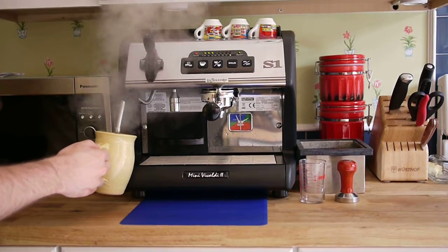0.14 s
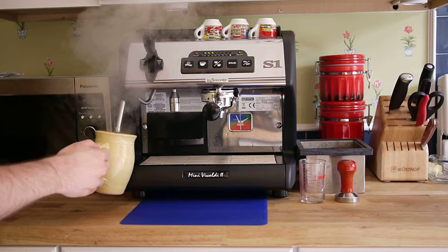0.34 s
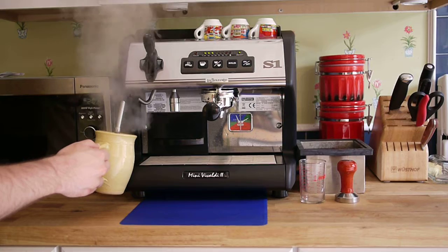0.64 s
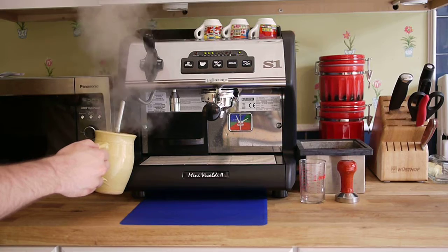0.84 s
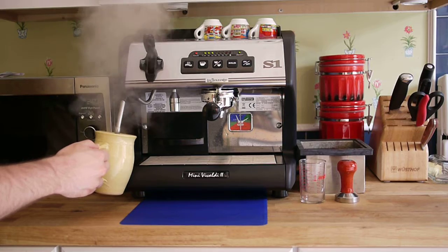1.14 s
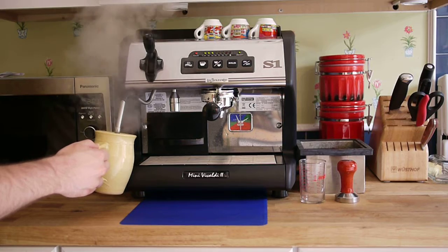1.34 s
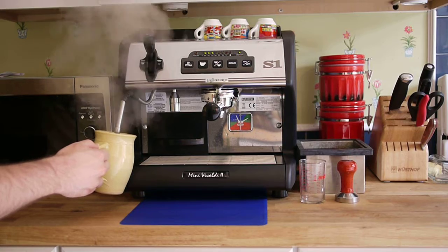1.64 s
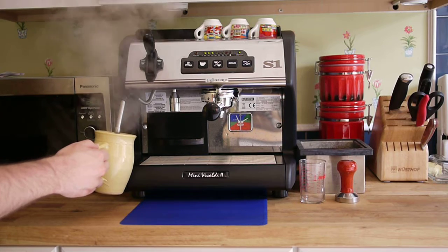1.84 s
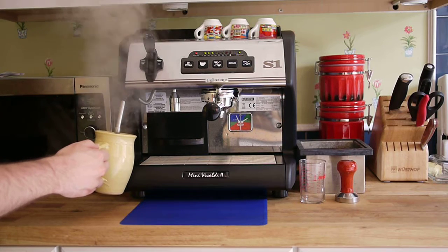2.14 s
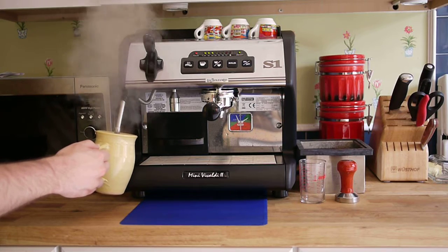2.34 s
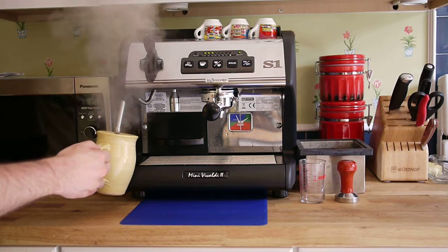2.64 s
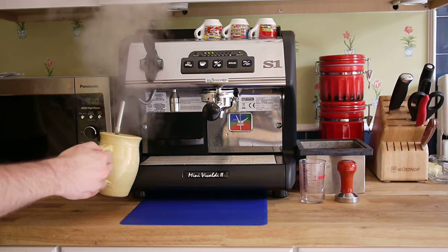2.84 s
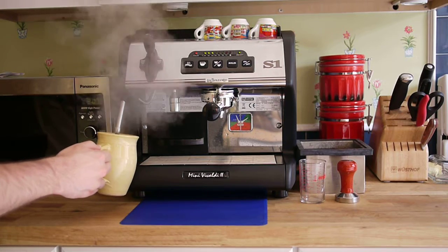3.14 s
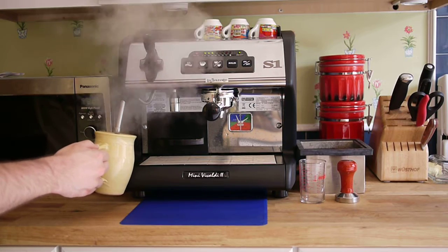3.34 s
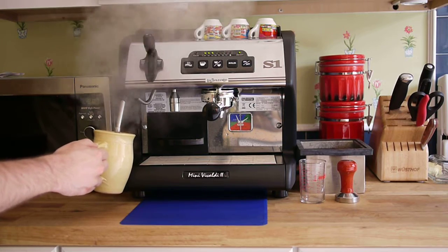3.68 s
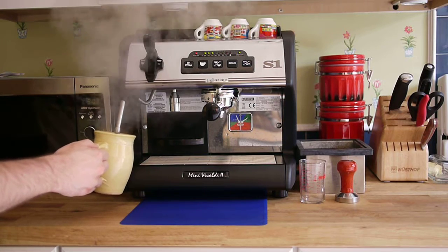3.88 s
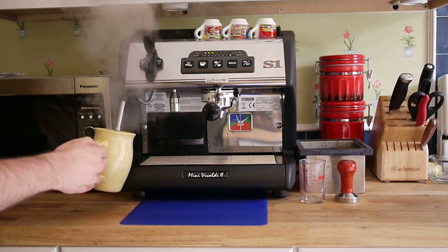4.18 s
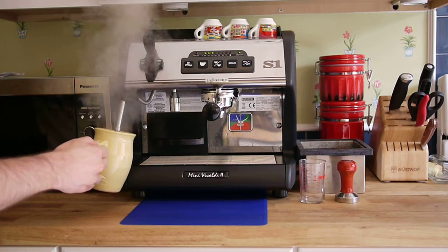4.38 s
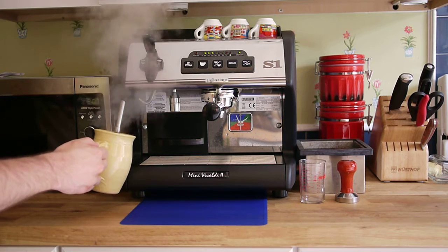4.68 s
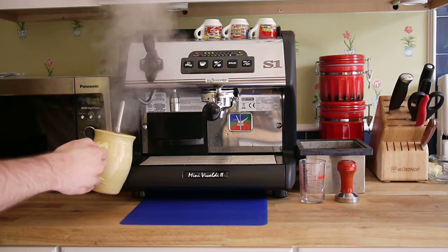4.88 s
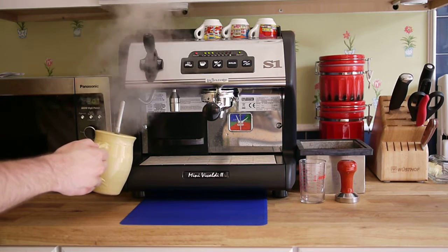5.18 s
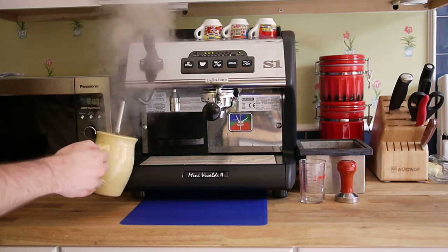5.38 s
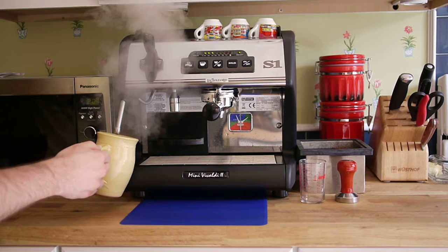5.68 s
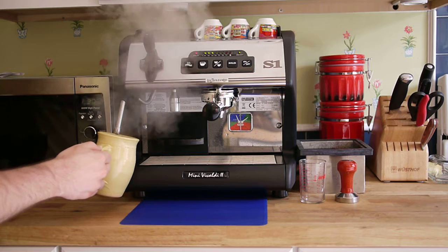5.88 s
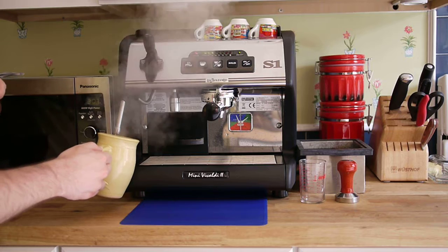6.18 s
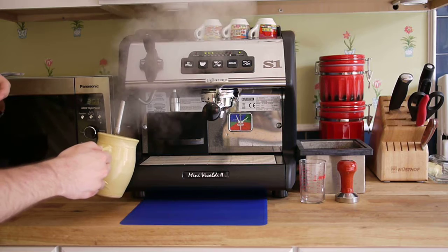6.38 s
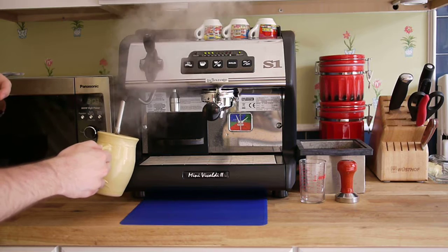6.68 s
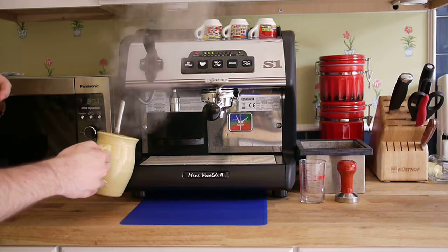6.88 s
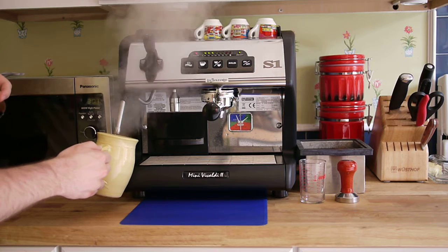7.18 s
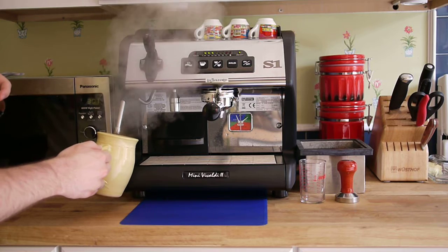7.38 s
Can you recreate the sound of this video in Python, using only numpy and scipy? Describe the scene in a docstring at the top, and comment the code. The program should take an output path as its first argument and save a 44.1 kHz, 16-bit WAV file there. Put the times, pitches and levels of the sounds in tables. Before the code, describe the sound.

From the first moment, an espresso machine's steam wand blows into an empty mug, making a bright, steady hiss over a hollow howl like a blown bottle. It continues at nearly the same level for about seven and a half seconds. As the mug shifts, its resonances swell and fade: higher, whistly tones come forward briefly around 0.3, 1.9, 3 and 6.2 seconds, and the hollow rush eases a little near 4.4. The howl surges briefly at about 1.6, 3.2, 7 and 7.4 seconds. Water droplets cause faint, short spits near 0.6, 3.7, 4.8 and 7.1 seconds, with a brighter one at 5.3. Underneath lie a soft low rumble and a very faint appliance hum. The small kitchen adds tight, hollow reflections, and the sound is mono with a dulled top end.

```python
"""A steady, bright hiss over a hollow howl: an espresso machine's steam wand blowing into an empty mug.
The jet rushes along the mug's wall and blows its hollow like a bottle; as the hand drifts, the mug's
air modes swell and fade, and now and then a water droplet makes the nozzle spit.
A small kitchen adds standing waves, a low rumble and a faint appliance hum.
A narrow-band mono recorder dulls the top end."""
import sys
import numpy as np
from scipy import signal
from scipy.fft import rfft, irfft
from scipy.io import wavfile

SR = 44100
rng = np.random.default_rng(int(sys.argv[2]) if len(sys.argv) > 2 else 0)


def file_out(sig):
    """Save sig as 16-bit WAV at sys.argv[1]."""
    # one column per channel
    cols = np.atleast_2d(sig).T
    # limit, then scale
    lim = np.clip(cols, -1, 1)
    pcm = np.round(lim * 32767).astype(np.int16)
    wavfile.write(sys.argv[1], SR, pcm)


N = 331632
TIME = np.arange(N) / SR
FREQS = np.fft.rfftfreq(N, 1 / SR)


def gain_of(db):
    """Decibels to amplitude."""
    return 10 ** (np.asarray(db) / 20)


def colour(points):
    """An EQ curve through (frequency [Hz], level [dB]) points on a log frequency axis."""
    hz, db = np.transpose(points)
    return gain_of(np.interp(np.log(FREQS + 1), np.log(hz), db))


def turbulence(shape):
    """Noise with the given spectral shape, at an rms of 1."""
    noise = irfft(rfft(rng.standard_normal(N)) * shape, N)
    return noise / np.sqrt(np.mean(noise ** 2) + 1e-30)


def waver(rate_hz, depth_db):
    """A gain that wanders at random, up to about the given rate; the depth is rms."""
    return gain_of(depth_db * turbulence(1 / (1 + (FREQS / rate_hz) ** 4)))


def noise_band(hz, width_hz, db):
    """A steep-sided band of turbulence, as when it rings an air mode."""
    detune = (FREQS - hz) / width_hz
    return gain_of(db) * turbulence(1 / np.sqrt(1 + (2 * detune) ** 4))


def swell(at, length):
    """A smooth rise and fall, 1 at its top and half that at the ends of its length."""
    return np.exp(-np.log(2) * (2 * (TIME - at) / length) ** 2)


def appliance_hum():
    """Motors in the kitchen hum in a few faint, unsteady tones."""
    # motor tones: (frequency [Hz], level [dB])
    tones = [(58.5, -87), (84, -85), (103.5, -78), (234, -71), (360, -74)]
    hum = np.zeros(N)
    for hz, db in tones:
        tone = np.sin(2 * np.pi * (hz * TIME + rng.random()))
        hum += gain_of(db) * tone * waver(rate_hz=4.6, depth_db=2.5)
    return hum


def rumble():
    """A low bed of noise from the machine and the room."""
    # rumble colour: (frequency [Hz], relative level [dB])
    spectrum = [(8, -40), (28, -13.5), (55, -17.5), (80, -9.5), (105, -0.5), (150, -5), (200, -2),
                (300, 0.5), (450, 0.5), (800, -2.5), (2000, -43.5)]
    return gain_of(-59.0) * turbulence(colour(spectrum))


def kitchen(x, t60=0.36):
    """Near echoes, standing waves and a short diffuse tail give the hiss its fixed, hollow grain."""
    # echoes off the machine's front and the counter: (delay [s], gain [linear])
    echoes = [(.001253, .06), (.002871, .1), (.006057, .08), (.007018, .05)]
    # standing waves between counter, wall and cupboards: (frequency [Hz], width [Hz], boost or cut [dB])
    standing_waves = [(179, 13, 8.9), (247, 30, 6.5), (658, 16, 7.7), (692, 14, 8.9), (719, 12, 7.3),
                      (753, 20, 8.6), (779, 15, 9.4), (876, 11, 4.7), (946, 14, 6.4), (978, 23, 6.5),
                      (1066, 25, 5.2), (1117, 22, 5.1), (1290, 26, 7.1), (1319, 16, 6.0), (1697, 27, 4.8),
                      (2002, 39, 5.0), (2161, 49, 6.0), (2203, 18, -7.5), (2305, 36, 4.1), (2411, 23, 5.2),
                      (2488, 11, 3.7), (3090, 38, 7.5), (3154, 34, 5.7), (3850, 19, 4.3), (4104, 25, 3.7),
                      (4969, 44, 5.8), (5091, 37, 3.9), (5958, 40, 2.7), (6264, 43, 3.2)]
    near = 1 + sum(gain * np.exp(-2j * np.pi * FREQS * delay) for delay, gain in echoes)
    standing_db = sum(db * np.exp(-np.log(2) * (2 * (FREQS - hz) / width) ** 2)
                      for hz, width, db in standing_waves)
    tail = rng.standard_normal(N) * gain_of(-60 * TIME / t60) * (TIME > .008)  # 8 ms pre-delay
    diffuse = gain_of(-12) * rfft(tail / np.linalg.norm(tail))
    return irfft(rfft(x) * (near * gain_of(standing_db) + diffuse), N)


def spits():
    """Short, flat-topped puffs of extra hiss as a droplet is torn into spray."""
    # droplets passing the nozzle: (time [s], length [s], centre [Hz], width [Hz], level [dB])
    droplets = [(.64, 0.14, 2050, 600, -54.5), (3.676, .1, 1900, 403, -56.5), (4.82, 0.18, 1910, 350, -56),
                (5.322, .12, 4200, 4500, -44), (7.065, 0.1, 1990, 1400, -51.5)]
    return sum(np.exp(-(2 * (TIME - at) / length) ** 4) * noise_band(hz, width, db)
               for at, length, hz, width, db in droplets)


def steam_flow():
    """The jet's strength as a gain; it drives the hiss and everything in the mug."""
    # jet envelope: (time [s], level [dB])
    envelope = [(0, -39.5), (1.0, -39.5), (3.0, -38.5), (4.2, -38.8), (4.85, -38.5), (5.5, -39),
                (6.8, -38.5), (7.52, -38.1)]
    return gain_of(np.interp(TIME, *np.transpose(envelope)))


def aim():
    """Four gains for the mug's layers: as it tilts away and back, the jet favours other modes."""
    # tilts: (time [s], length [s], howl [dB], wall rush [dB], second mode [dB], third mode [dB])
    tilts = [(.33, .12, 0, -1.5, 2, 7), (1.87, 0.22, -1.5, -0.5, 0.5, 8.5), (3.023, 0.3, -4, 0.5, 6, 4.5),
             (4.405, 0.73, -2, -2.5, -2, 1), (5.48, .5, 1.2, -0.3, -2.5, -14), (6.17, 0.45, 1.7, 1.3, 3, 5)]
    return gain_of(sum(np.outer(changes_db, swell(at, length)) for at, length, *changes_db in tilts))


def mug(flow):
    """The jet rushes along the wall and blows the hollow like a bottle; each layer follows the aim."""
    # colour of the steam on the wall: (frequency [Hz], relative level [dB])
    wall_spectrum = [(40, -41), (200, -12.5), (400, -5), (560, -2.5), (850, -4), (1080, 3), (1300, -2.5),
                     (1650, -1.5), (1900, -5.5), (3000, -18)]
    # the jet catches the hollow squarely and the howl surges: (time [s], length [s], boost [dB])
    surges = [(1.608, 0.044, 4.5), (3.23, 0.082, 3), (3.55, 0.098, 1.5), (7.05, 0.057, 6),
              (7.375, 0.18, 2.5)]
    to_howl, to_wall, to_second, to_third = aim()
    surge = gain_of(sum(db * swell(at, length) for at, length, db in surges))
    # levels are relative to the flow, at the usual aim
    howl = to_howl * surge * waver(rate_hz=4.4, depth_db=0.3)
    howl *= noise_band(hz=726.4, width_hz=195, db=-10)
    rush = to_wall * waver(rate_hz=1.6, depth_db=0.8)
    rush *= gain_of(-11.5) * turbulence(colour(wall_spectrum))
    second_mode = to_second * waver(rate_hz=5.5, depth_db=0.4)
    second_mode *= noise_band(hz=2310, width_hz=340, db=-16)
    third_mode = to_third * waver(rate_hz=8.6, depth_db=0.75)
    third_mode *= noise_band(hz=3112, width_hz=130, db=-23.5)
    flutter = waver(rate_hz=60, depth_db=1.07)  # the jet flaps against the wall
    return flow * (howl + flutter * (rush + second_mode + third_mode))


def jet(flow):
    """The nozzle's hiss, flickering with the wetness of the steam, and the high modes that it rings."""
    # colour of the free jet: (frequency [Hz], relative level [dB])
    spectrum = [(40, -56), (400, -18), (1500, -9), (2100, -7.5), (2700, -0.5), (3500, -0.5), (4500, 0.4),
                (5300, 1.5), (6400, -1), (7000, -1), (8000, -1)]
    # the mug's high air modes: (frequency [Hz], width [Hz], level relative to the flow [dB])
    high_modes = [(4000, 370, -15), (5350, 740, -34.5), (5820, 310, -14)]
    hiss = gain_of(2.0) * turbulence(colour(spectrum)) * waver(rate_hz=7.4, depth_db=0.5)
    ringing = sum(noise_band(*mode) for mode in high_modes)
    return flow * (hiss + ringing)


def scene():
    """Wand and mug in the kitchen, the same in both channels."""
    bed, hum = rumble(), appliance_hum()
    flow = steam_flow()
    steam = jet(flow) + mug(flow) + spits()
    mono = kitchen(bed + steam) + hum
    return np.array([mono, mono])


def record(dry, low_cut_hz=22, edge_hz=9076):
    """A narrow-band recorder: no sub-bass; the treble falls into a notch, then a faint lobe ends it."""
    # roll-off around half the recorder's low sampling rate: (frequency [Hz], gain [dB])
    roll_off = [(7000, 0), (7400, -4), (7650, -10), (7850, -19), (7950, -29), (8000, -48), (8050, -30),
                (8150, -23), (8350, -19.5), (8600, -22), (8850, -30), (9100, -42)]
    treble = gain_of(np.interp(FREQS, *np.transpose(roll_off)))
    low_cut = FREQS ** 2 / np.hypot(FREQS ** 2, low_cut_hz ** 2)
    band = irfft(rfft(dry) * low_cut * treble, N)
    brick_wall = signal.firwin(511, edge_hz, window=("kaiser", 9), fs=SR)
    return signal.oaconvolve(band, brick_wall[None], "same")


dry = scene()
out = record(dry)
file_out(out)
```